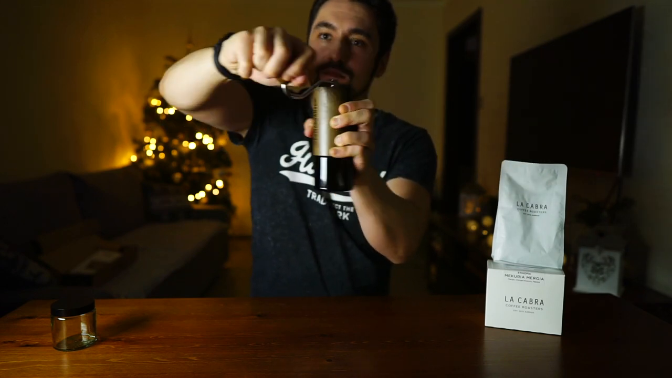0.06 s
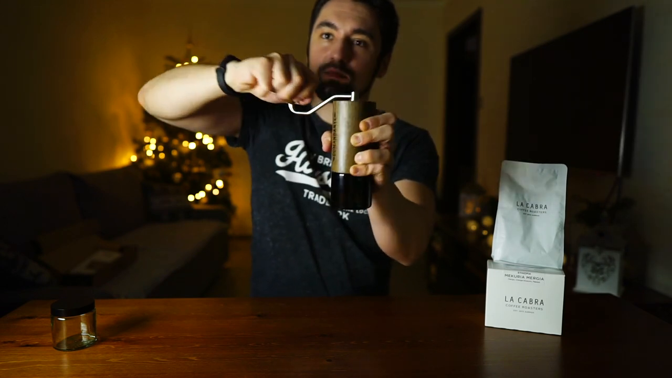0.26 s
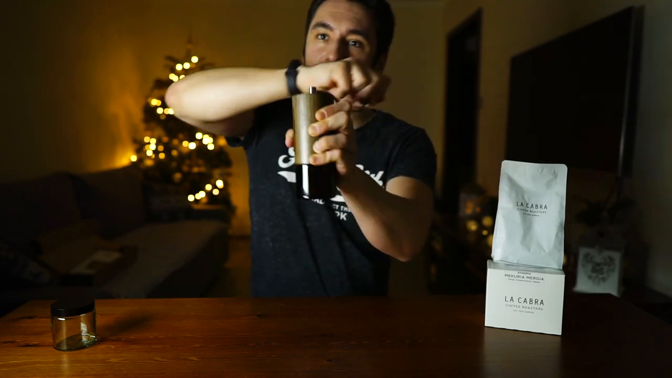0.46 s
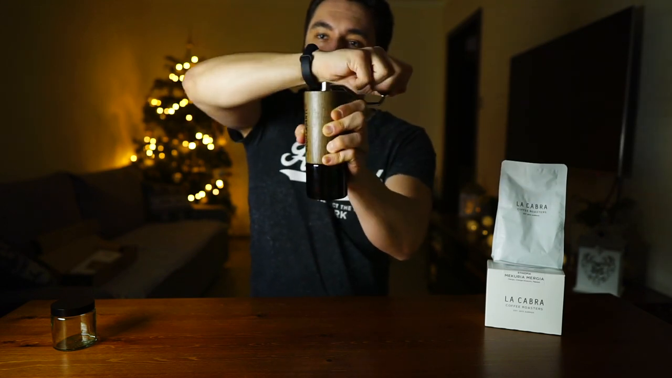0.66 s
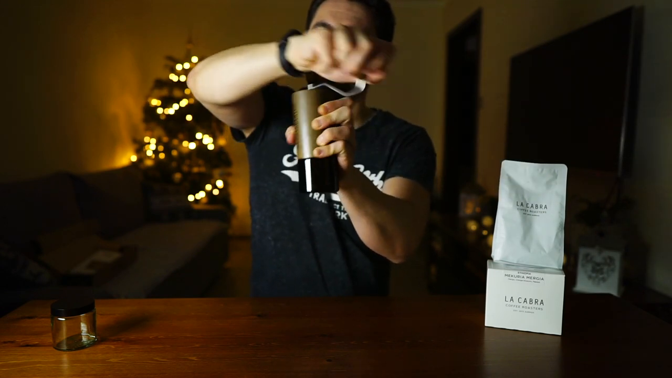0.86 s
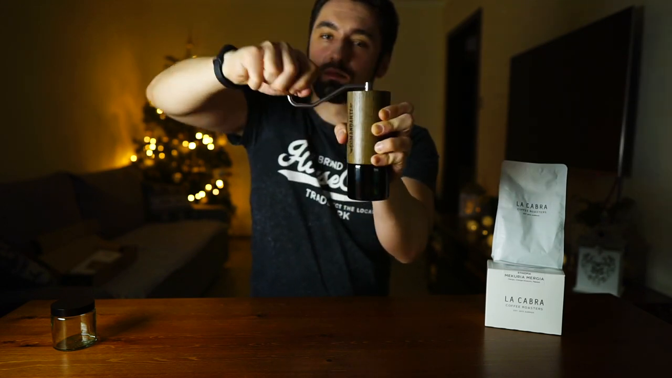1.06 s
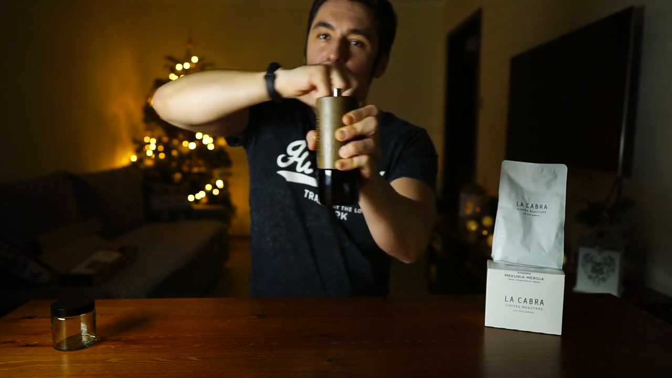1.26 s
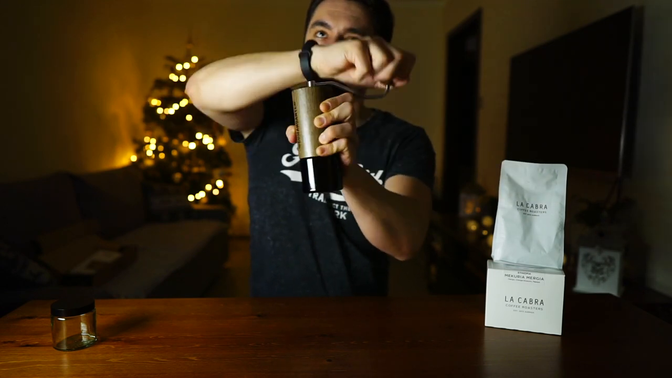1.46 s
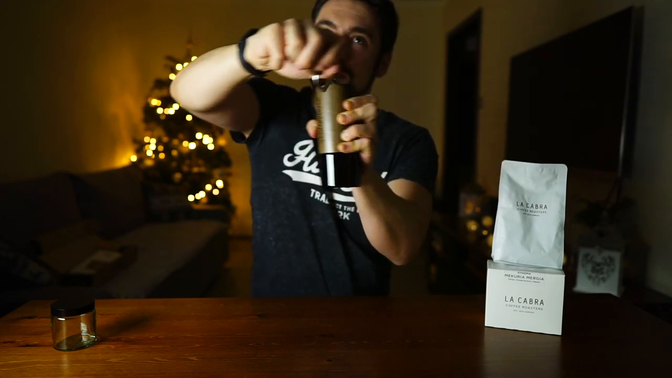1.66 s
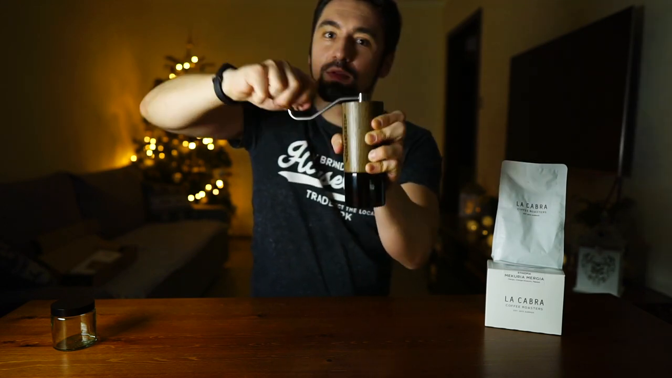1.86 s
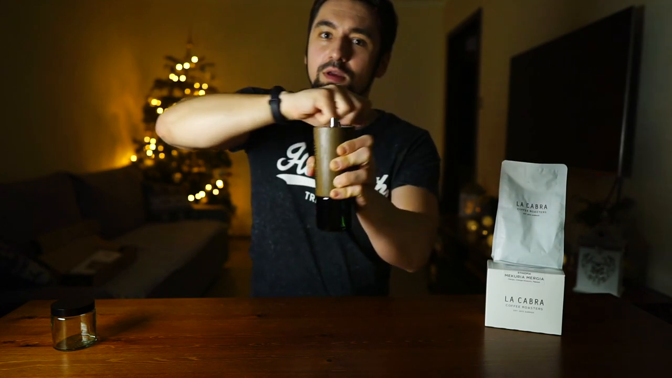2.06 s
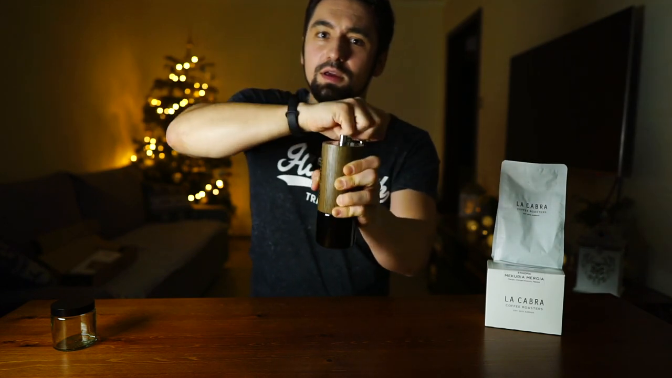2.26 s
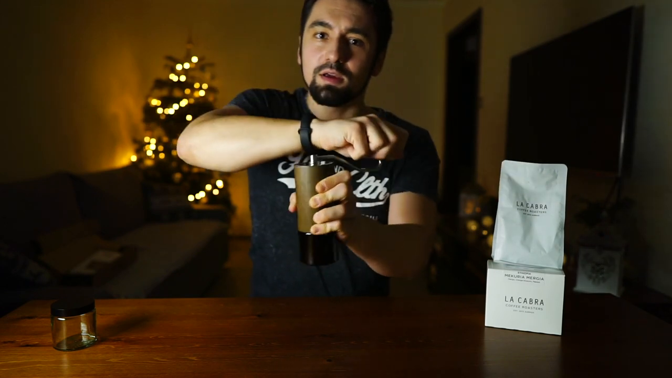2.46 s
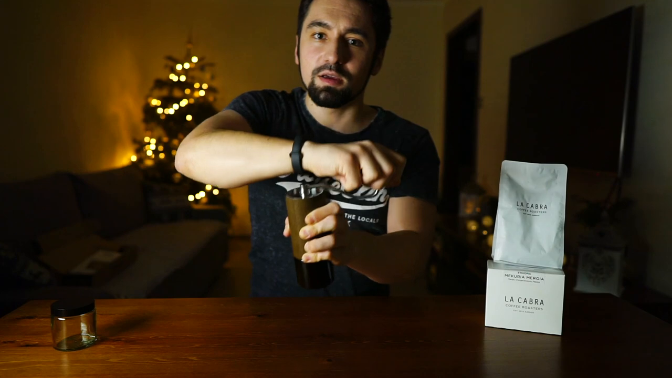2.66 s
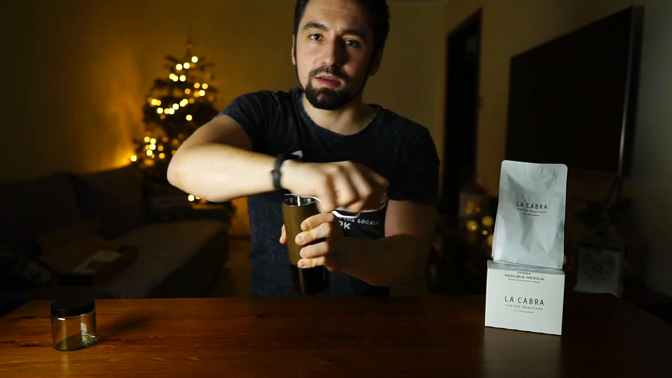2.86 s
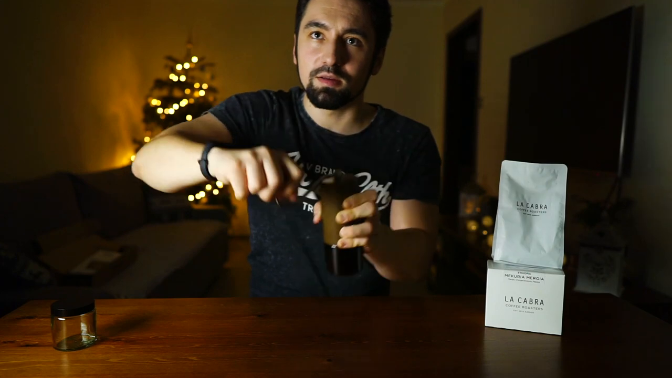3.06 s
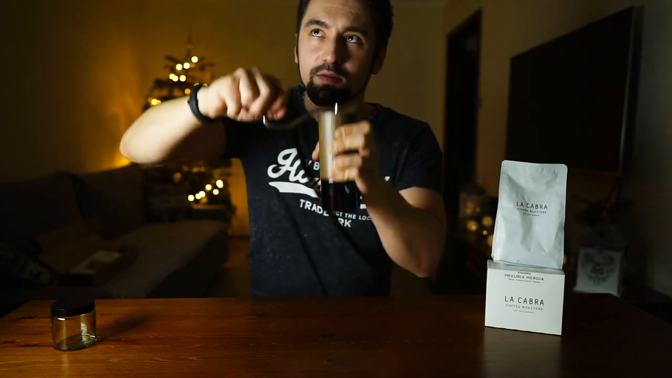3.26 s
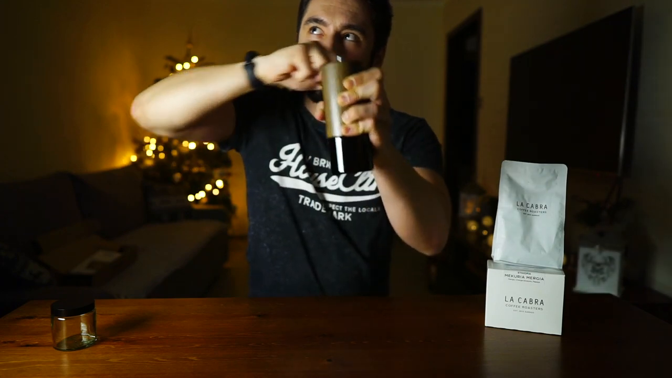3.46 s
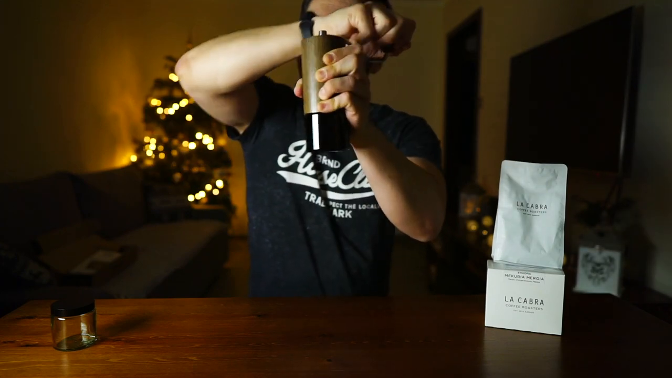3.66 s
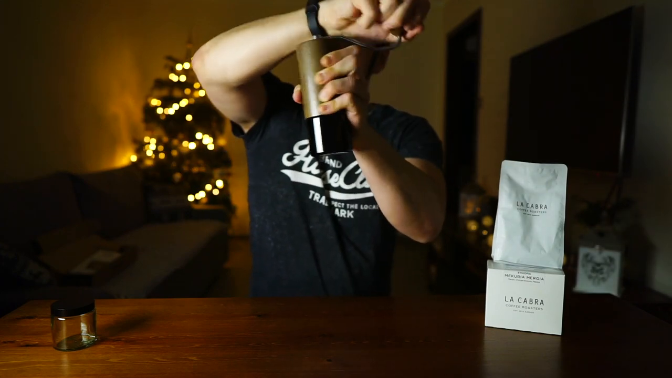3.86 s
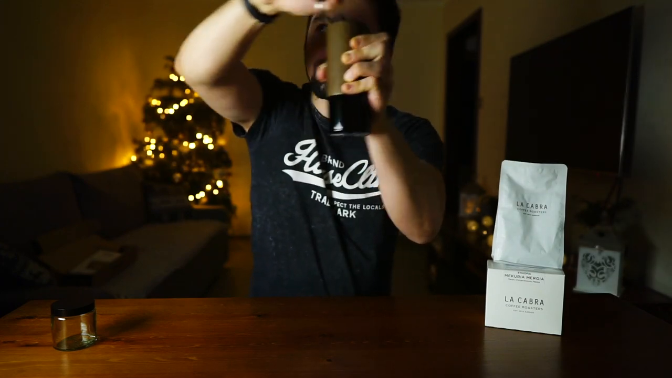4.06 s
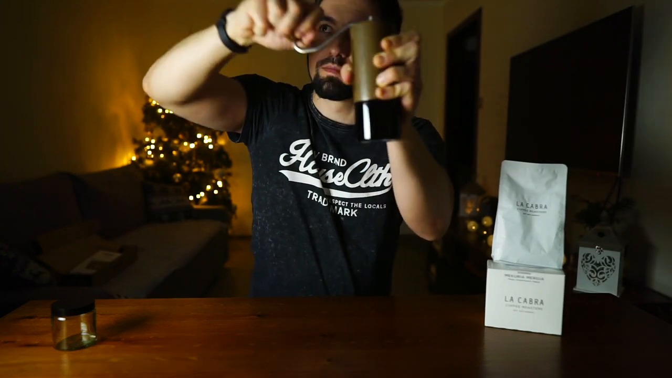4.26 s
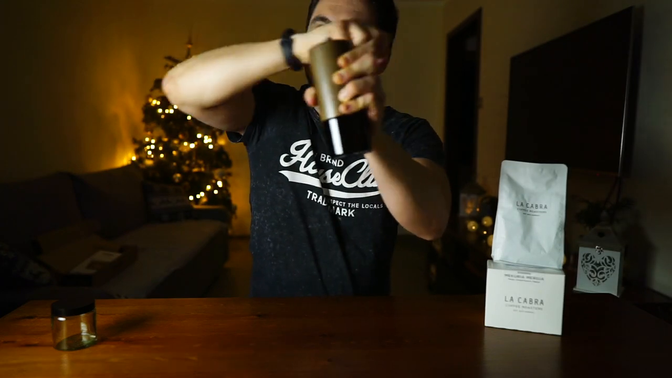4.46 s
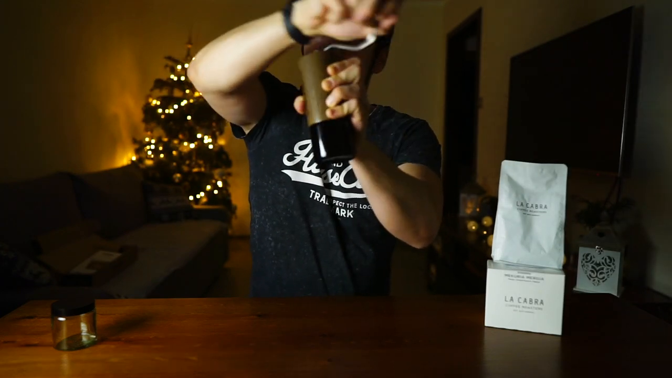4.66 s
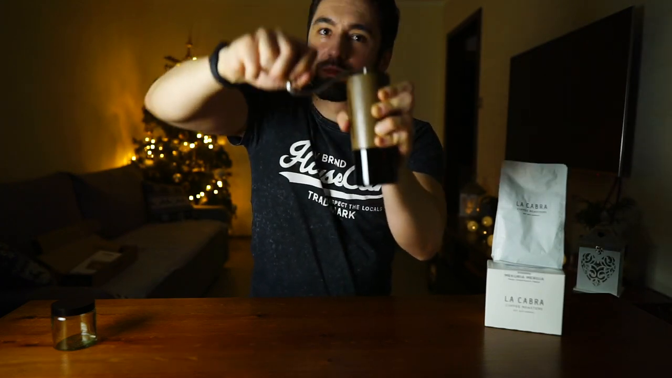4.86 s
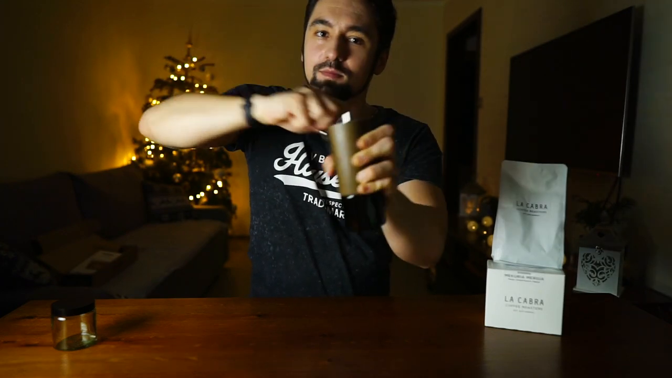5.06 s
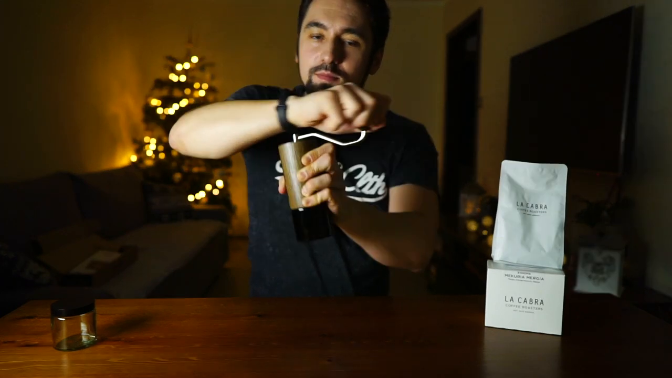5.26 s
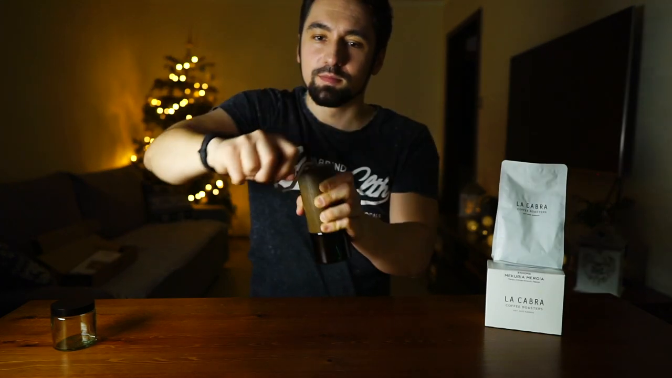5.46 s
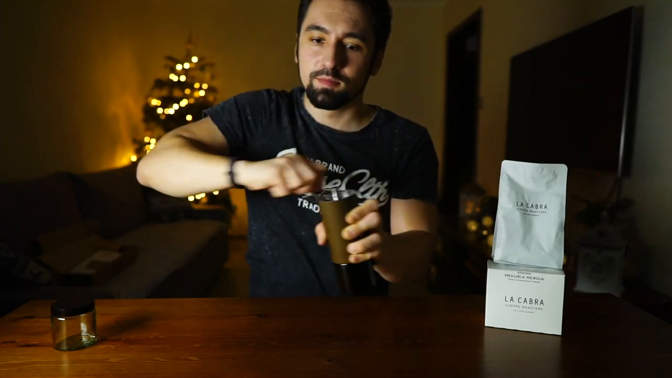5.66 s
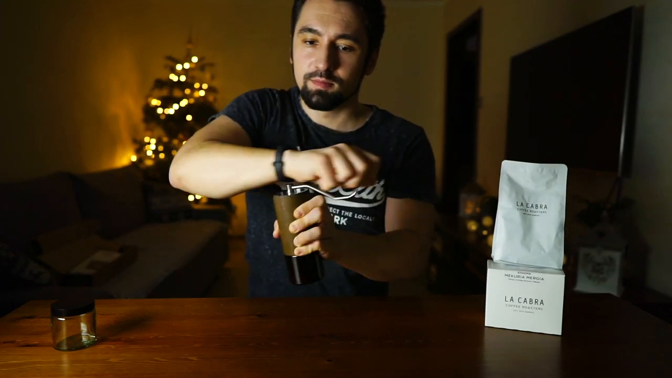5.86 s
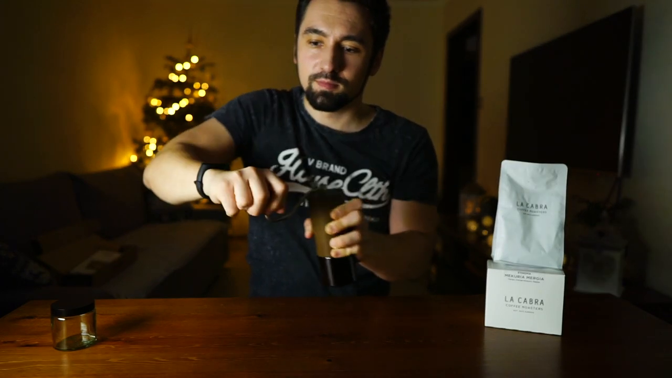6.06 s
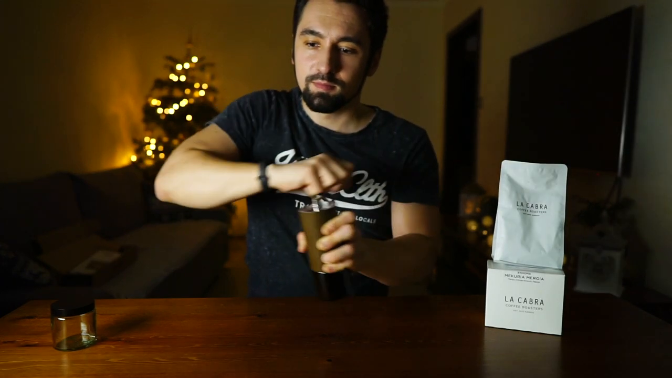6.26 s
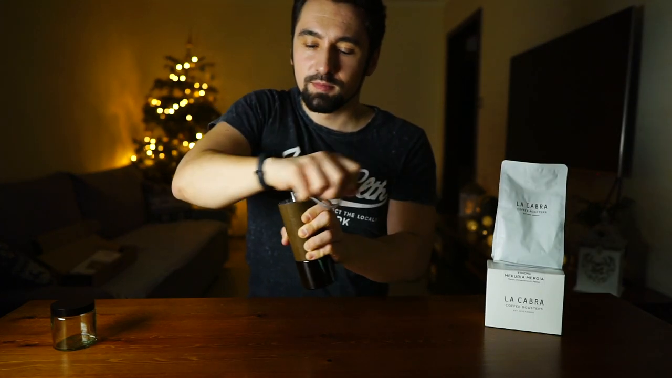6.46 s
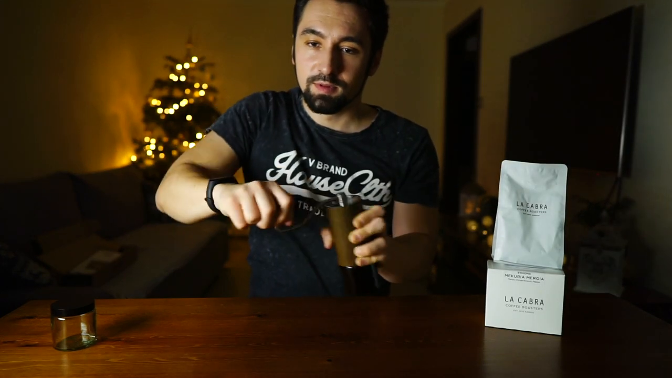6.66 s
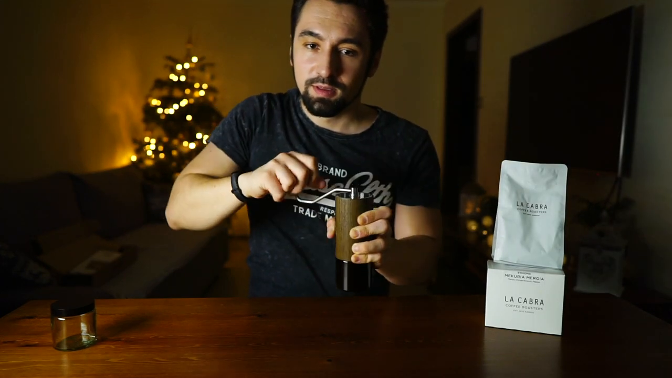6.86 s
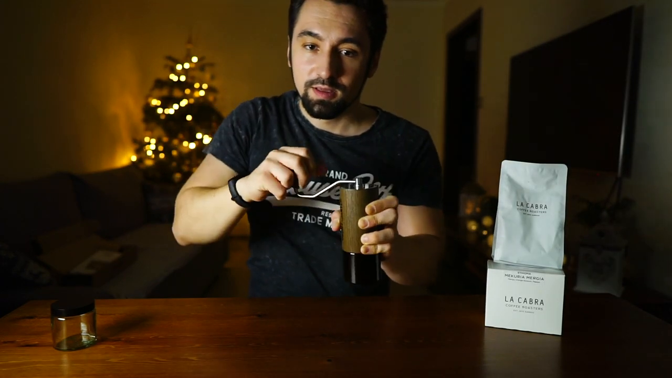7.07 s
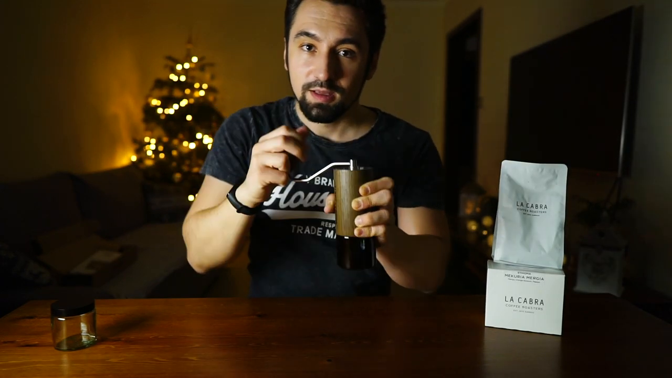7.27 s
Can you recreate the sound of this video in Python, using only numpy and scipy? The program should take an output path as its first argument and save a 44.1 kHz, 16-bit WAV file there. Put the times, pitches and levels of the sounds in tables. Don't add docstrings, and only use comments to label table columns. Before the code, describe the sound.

A hand-cranked coffee grinder is already crunching at the start, close and dry in a furnished room. Gritty, noisy strokes rub and crackle, with low air puffs at the microphone. From about 0.55 to 0.7 seconds it stalls, leaving small ticks, then bites again with sharp snaps and hollow metallic knocks until about 2.1. Around 2.1 to 2.9 the grinding breaks into short, weaker scraps with clicks and gaps; a barely audible distant engine climbs in pitch and fades by 3.1. Cracking resumes strongly near 3.35, catches around 3.7, and is densest and loudest from 4 to 5, with bright splintering and soft low gusts. After 5.1 the tube rings hollower; longer, steadier strokes soften, with scattered cracks until about 6.8. Then only short room reflections, faint hiss and a slight hum remain.

```python
import sys
import numpy as np
from scipy import signal
from scipy.fft import rfft, irfft
from scipy.io import wavfile

SR = 44100
rng = np.random.default_rng(int(sys.argv[2]) if len(sys.argv) > 2 else 0)


def undo_db(level):
    steps = np.asarray(level, float) / 20
    return 10 ** steps


def log_audio(samples):
    frames = np.atleast_2d(samples).T
    limited = np.clip(frames, -1, 1)
    pcm = np.round(limited * 32767).astype(np.int16)
    wavfile.write(sys.argv[1], SR, pcm)


N = 322812


def grinder():
    # [hz, width_hz, level_db]
    tube_modes = [(347, 640, -41), (660, 310, -22), (800, 109.6, -2), (995.8, 58, 1.5), (1185, 162, -13.5)]
    # [hz, width_hz, level_db]
    shell_modes = [(1410, 810, -7.5), (2019, 338, 0), (2265, 299, -1), (3022, 228, -1.5),
                   (4400, 570, -10.5)]
    # [hz, width_hz, level_db]
    burr_modes = [(5066, 500, -4), (5916, 630, 0.5), (8344, 1170, 0.5), (10060, 1200, -2),
                  (13870, 670, -15.5)]
    # [hz, width_hz, level_db]
    splinter_modes = [(9360, 690, -7.5), (14900, 1100, -2)]

    effort, hollow, facing = crank()
    fine = grit(700, spread_db=0.0, seconds=0.0014, rise=2.3, smooth=1.0)
    finer = grit(900, spread_db=7.0, seconds=0.00099, rise=2.5, smooth=0.33)
    coarse = grit(110, spread_db=1.5, seconds=0.0055, rise=3.3, smooth=4.3)
    chips = grit(45, spread_db=6.5, seconds=0.00066, rise=0.6, smooth=1.2)

    snaps, knocks = fractures(effort)
    snap = burst(snaps, 0.0025, 0.32)
    tiny_snap = burst(snaps, 0.00066, 0.15)
    knock = burst(knocks, 0.0028, 0.23)

    shell = undo_db(-6) * effort * evened(fine * coarse)
    shell += undo_db(-6.5 + 4.2 * wander(per_s=60)) * snap
    burrs = undo_db(-4.5) * effort * facing * evened((finer + 0.98 * fine) * coarse)
    burrs += undo_db(-3) * snap
    tube = undo_db(-3) * hollow * evened(coarse * (fine + 0.51)) + knock
    splinters = effort * facing ** 2.5 * chips
    splinters += undo_db(10 + 4 * wander(per_s=60)) * tiny_snap
    splinters *= undo_db(-24.5)

    noise, hiss = rng.standard_normal((2, N))
    body = ring(noise * tube, tube_modes, 290, 1390, shift_db=1.05)
    body += ring(noise * shell, shell_modes, 1200, 6000, shift_db=1.24)
    treble = ring(hiss * burrs, burr_modes, 3800, 19000, shift_db=1.1)
    treble += ring(hiss[::-1] * splinters, splinter_modes, 8000, 18000, shift_db=0.8)
    return body + treble


def crank():
    # [start_s, length_s, effort_db, effort_drift_over_stroke_db]
    strokes = [(0, .32, -18.5, -5.5), (0.328, 0.22, -18.5, -5.5), (0.714, 0.076, -29, 17),
               (0.859, 0.29, -15.5, -8.5), (1.134, 0.31, -22.5, 3), (1.446, 0.063, -27, 0.5),
               (1.515, 0.21, -18.5, -5.5), (1.724, .13, -20.5, -5), (1.861, .23, -22.5, -0.5),
               (2.106, 0.053, -21.5, -5), (2.338, 0.097, -36.5, -4.5), (2.434, 0.13, -21, -10),
               (2.634, 0.043, -21, -11.5), (2.716, 0.053, -23.5, -14), (2.864, .072, -41, 19.5),
               (2.948, 0.22, -20, -4), (3.177, .025, -33, -0.5), (3.339, 0.34, -17.5, -0.5),
               (3.705, 0.052, -36, 4), (3.887, 0.048, -18, 0.5), (3.974, .171, -17.5, 4),
               (4.152, 0.3, -19.5, -0.5), (4.431, 0.18, -16.5, -3), (4.632, 0.33, -15.5, -8),
               (4.987, 0.084, -31, 4.5), (5.072, .485, -19.5, -5), (5.556, 0.18, -24, 5.5),
               (5.735, 0.18, -25, 1.5), (5.922, 0.46, -22, -0.5), (6.372, 0.46, -23.5, 2.5)]
    # [peak_s, effort_db, tube_ring_db, length_s]
    surges = [(0.06, -4.5, -3.5, 0.04), (0.43, 0, 12.5, 0.077), (0.904, -9, 6.5, 0.024),
              (0.96, 6.5, -3.5, 0.061), (1.424, -7.5, 10, 0.033), (1.77, 6.5, -3.5, 0.039),
              (1.796, -9, 6, 0.014), (1.812, 11.5, 0.5, 0.028), (1.972, 5.5, -8, 0.019),
              (2.465, 4, 9, 0.073), (2.507, -13, -6, 0.046), (2.546, 4, 8, 0.02), (2.911, 11, 2, 0.063),
              (3.396, -1, 0, 0.072), (3.658, 2.5, -4, 0.041), (3.737, 5.5, -4.5, .02), (3.904, 5, 8, 0.037),
              (3.984, 7, 8, 0.027), (4.008, -3, -10.5, 0.072), (4.065, 1, 2, 0.11),
              (4.443, 7.5, 2.5, 0.036), (4.656, 3, 3, 0.024), (4.701, -7.5, -3.5, 0.026),
              (4.738, 4.5, -4, .04), (5.017, 12, -8, 0.043), (5.068, 7, -6, 0.11), (5.848, 6.5, 1, 0.076),
              (5.953, 0, 7, 0.05), (6.374, 3, 2.5, 0.052), (6.69, 3, 1.5, 0.15)]
    # [peak_s, tube_ring_db, length_s]
    swells = [(0.03, -2, 0.076), (0.115, -1, 0.047), (0.246, -3.5, 0.067), (0.297, 1, 0.034),
              (.75, 3, 0.029), (0.995, 6.5, 0.039), (1.14, 1, 0.039), (1.365, 3.5, .08), (1.71, 0, 0.045),
              (1.916, -15.5, 0.029), (2.037, 1.5, .07), (2.377, 2, .1), (2.657, 4, 0.039),
              (2.728, 10, 0.038), (3.39, -1, 0.041), (3.644, 2.5, 0.044), (4.261, 4, .04),
              (4.31, -1.5, .04), (4.526, 1.5, 0.16), (4.79, 5.5, 0.11), (5.115, 11, .05),
              (5.175, 11, 0.037), (5.301, 5, 0.11), (5.412, 4.5, 0.13), (5.578, -8, 0.069),
              (5.675, 1, 0.16), (5.79, -3, 0.039), (5.998, 5, 0.068), (6.132, -8, 0.16), (6.497, 4, 0.11)]
    # [time_s, treble_lift_facing_microphone_db, tube_freedom_db]
    grip = [(0, -0.5, 6), (.4, 1, 0.5), (.8, -0.5, 2.5), (1.2, -0.5, 3), (1.6, 1, 3), (1.9, -1, 3.5),
            (2.3, 0, 0.5), (2.7, 0, -7), (3.0, -0.5, 7.5), (3.45, 1, 1), (3.65, 0.5, 4), (3.8, 3, 0),
            (4.2, -2, 0), (4.5, 1, 3), (5.1, -1, 1), (5.6, 0, 5), (6.2, 1.5, 6.5), (6.85, -1.5, 1.5)]
    bite_s, bite_db = 0.004, -8
    ease_s, ease_db = 0.0092, -6.5

    t = np.arange(0, N + 32, 32) / SR
    effort, lift_db, ring_db = np.zeros((3, len(t)))
    for start, length, effort_db, drift_db in strokes:
        u = t - start
        stroke_db = effort_db + drift_db * np.clip(u / length, 0, 1)
        if start > 0:
            stroke_db += bite_db * np.clip(1 - u / bite_s, 0, 1)
        stroke_db += ease_db * np.clip(1 - (length - u) / ease_s, 0, 1)
        effort = np.maximum(effort, (u >= 0) * (u < length) * undo_db(stroke_db))
    for peak, surge_db, extra_db, length in surges:
        lift_db += surge_db * hump(t, peak, length)
        ring_db += extra_db * hump(t, peak, length)
    for peak, swell_db, length in swells:
        ring_db += swell_db * hump(t, peak, length)

    now = np.arange(N) / SR
    grip_s, facing_db, free_db = np.transpose(grip)
    effort = np.interp(now, t, effort * undo_db(lift_db)) * undo_db(0.7 * wander(per_s=40))
    hollow_db = np.interp(now, t, ring_db) + np.interp(now, grip_s, free_db)
    hollow = effort * undo_db(hollow_db + 1.03 * wander(per_s=30))
    return effort, hollow, undo_db(np.interp(now, grip_s, facing_db))


def hump(t, peak_s, length):
    rise = 0.39
    up = 1 + (t - peak_s) / (rise * length)
    down = 1 - (t - peak_s) / ((1 - rise) * length)
    return np.clip(np.minimum(up, down), 0, 1)


def fractures(effort):
    # [time_s, snap_peak_db, tube_ring_peak_db]
    cracks = [(0.1487, -13, -10), (1.315, -4, -17), (0.3373, -11, -26.5), (0.397, 3, -7), (0.711, 1, -13.5),
              (0.7476, -9, -15.5), (.782, 0, -6), (0.854, 0.5, -12), (1.046, -7, -3.5), (1.143, 2, -20),
              (1.3512, -3, 0), (1.512, 3.5, -1.5), (1.58, 3, 0), (1.6068, 2.5, 2), (2.063, -3.5, -1),
              (2.436, -18, -15), (2.6341, -5, -9.5), (2.717, -4.5, -30), (2.951, -21, 0.5), (3.015, 2, 2),
              (3.3348, -5, -20), (3.394, 6, -3), (3.5775, 0.5, -8.5), (3.737, 1.5, -7), (3.84, 0.5, -28),
              (3.8509, 0, -1), (3.8935, -3.5, -14), (3.973, 2.5, -3), (4.138, -2.5, -7.5),
              (4.168, 3.5, -12.5), (4.205, -4.5, 0)]
    # [time_s, snap_peak_db, tube_ring_peak_db]
    late_cracks = [(4.256, -13, 0.5), (4.264, 1, -12), (4.318, 0, -30), (4.3994, 5.5, 1), (4.482, -5, -13),
                   (4.641, -12, -15), (4.7305, -1, -12), (4.865, -1, -9), (4.907, -7, -28),
                   (4.988, -7, -45), (5.0504, -1, -14), (5.1177, 2, -16), (5.1967, -7.5, -12.5),
                   (5.4024, -2, -11), (5.669, -3.5, -8.5), (5.899, -4.5, -21), (5.928, -13, -6),
                   (6.041, -9.5, -22), (6.105, -5, -24), (6.3442, -8, -15), (6.565, -22, -9),
                   (6.41, -4, -12), (6.725, -7, -16), (6.7844, -6.5, -22), (6.844, -3, -26.5)]
    # [time_s, snap_peak_db, tube_ring_peak_db]
    ticks = [(0.5921, -12.5, -32.5), (0.6285, -10, -33.5), (0.668, -21, -46), (0.681, -14, -35.5),
             (2.198, -14, -40), (2.3442, -37, -35.5), (2.363, -10.5, -39), (2.387, -15.5, -28),
             (2.424, -23, -36), (2.5232, -20, -10.5), (2.54, -9, -28.5), (2.611, -20, -36),
             (2.737, -13, -22.5), (2.7556, -15, -40), (3.1888, -4, -34), (3.31, -25.5, -48),
             (3.3222, -14, -34), (3.713, -4.5, -20), (3.7514, -13, -37.5), (3.7606, -24, -35.5),
             (3.9594, -7.5, -35.5)]
    chips_per_s, spread_db = 10, 2.5

    lesser = (rng.random(N) < chips_per_s / SR) * effort
    snaps = lesser * undo_db(9.5 + spread_db * rng.standard_normal(N))
    knocks = lesser * undo_db(4 + spread_db * rng.standard_normal(N))
    for events in (cracks, late_cracks, ticks):
        for s, snap_db, knock_db in events:
            at = round(s * SR)
            snaps[at] = undo_db(snap_db)
            knocks[at] = undo_db(knock_db)
    return undo_db(-14) * snaps, undo_db(-7.0) * knocks


def grit(per_s, spread_db, seconds, rise, smooth):
    sizes = undo_db(spread_db * np.minimum(rng.exponential(1, N), 3.5))
    train = sizes * (rng.random(N) < per_s / SR)
    return evened(evened(burst(train, seconds, rise)) + smooth)


def burst(train, seconds, rise):
    u = np.arange(600) / (max(seconds, 1e-4) * SR)
    shape = (1 - np.exp(-u / max(rise, 1e-3))) * np.exp(-u ** 1.84)
    return signal.oaconvolve(train, shape / shape.max())[:N]


def ring(drive, modes, low_hz, high_hz, shift_db):
    band = signal.butter(3, [low_hz, high_hz], "bandpass", fs=SR, output="sos")
    total = np.zeros(N)
    click = np.zeros(8192)
    for k, (hz, width, db) in enumerate(modes):
        b, a = signal.iirpeak(hz, hz / width, SR)
        b = b * (-1) ** k * undo_db(db)
        share_db = shift_db * (wander(per_s=22) + 1.17 * wander(per_s=6))
        total += signal.lfilter(b, a, drive * undo_db(share_db))
        click += signal.lfilter(b, a, signal.unit_impulse(8192))
    return signal.sosfilt(band, total) / np.linalg.norm(signal.sosfilt(band, click))


def room(x, count=20):
    place = np.arange(N) / N * (count - 1)
    out = np.zeros(N + SR)
    for k in range(count):
        share = np.cos(np.pi / 2 * np.clip(place - k, -1, 1))
        live = np.flatnonzero(share > 1e-9)
        start, end = live[0], live[-1] + 1
        wet = signal.fftconvolve((x * share)[start:end], tail())
        out[start:start + len(wet)] += wet
    return out[:N]


def tail():
    # [hz, t60_s]
    decay = [(500, 0.35), (1000, 0.39), (2500, 0.39), (5500, .35), (8500, 0.29), (14000, .24)]
    length = SR // 2
    taps = np.zeros(length)
    at = np.arange(130, length - 16, 16)
    taps[at + rng.integers(0, 16, len(at))] = rng.choice([-1.0, 1.0], len(at))
    taps *= 1 - np.exp(-np.arange(length) / (0.014 * SR))
    hz, t, z = signal.stft(taps, SR, nperseg=256)
    fade = undo_db(-60 * t / read(decay, hz)[:, None])
    echo = signal.istft(z * fade, SR, nperseg=256)[1]
    return echo / np.linalg.norm(echo)


def puffs():
    # [peak_s, length_s, push_db, fast_edge_flutter_relative_db]
    gusts = [(0, 0.086, -25.5, -14.5), (0.162, 0.16, -23.5, -28), (.38, 0.19, -40.5, -16),
             (0.902, 0.09, -36, -26.5), (1.042, 0.11, -25.5, -18), (1.16, .18, -31, -23.5),
             (1.5, 0.51, -48.5, -24.5), (1.708, 0.18, -44, -14), (1.87, 0.13, -36, -22),
             (2.0, 0.16, -49, -15), (3.41, 0.13, -32, -10.5), (3.516, 0.21, -33.5, -28.5),
             (3.69, 0.092, -40.5, 0), (3.972, .2, -26, -38.5), (4.147, 0.16, -18, -11),
             (4.274, 0.21, -25, -9), (4.382, 0.17, -25.5, -22), (4.515, 0.086, -30.5, -30),
             (4.72, .2, -40, -8.5), (4.86, 0.22, -24.5, -21), (5.052, .22, -35, -23), (5.4, 0.13, -45, -22),
             (5.66, 0.18, -51, -19), (6.75, .2, -54, -20)]
    # [hz, density_db]
    push_colour = [(4, 8.5), (12, 1.5), (32, -2), (70, -7), (120, -33.5), (250, -57.5)]
    # [hz, density_db]
    flutter_colour = [(50, -20.5), (100, 2.5), (170, -6), (240, -10), (400, -17.5), (700, -60)]
    calm_db, calm_flutter_db = -56, -19.5
    fall_db, rise = 16, 0.88

    t = np.arange(0, N / SR + 0.01, 0.002)
    push = np.full(len(t), undo_db(calm_db))
    flutter = np.full(len(t), undo_db(calm_db + calm_flutter_db))
    for peak, length, db, flutter_db in gusts:
        away = np.maximum(t - peak, (peak - t) / rise) / (length / 2)
        gust = undo_db(db - fall_db * away)
        push += gust
        flutter += gust * undo_db(flutter_db)
    now = np.arange(N) / SR
    slow = np.interp(now, t, push) * coloured(push_colour)
    return slow + np.interp(now, t, flutter) * coloured(flutter_colour)


def floor(loud):
    # [hz, density_db]
    hiss_colour = [(40, -20), (70, -12), (140, -8), (230, -9), (340, -16), (480, -15), (800, -22),
                   (1500, -29), (4000, -32), (12500, -26), (16000, -28)]
    # [hz, width_hz, level_db]
    hum_modes = [(226, 21, 0)]
    recent = signal.lfilter([1 / 1200], [1, 1 / 1200 - 1], loud ** 2)
    recent_db = 10 * np.log10(recent + 1e-12)
    held = undo_db(-5 * np.clip((recent_db + 58) / 14, 0, 1))
    hum = evened(ring(rng.standard_normal(N), hum_modes, 150, 320, shift_db=3.1))
    return undo_db(-66) * held * coloured(hiss_colour) + undo_db(-75.5) * hum


def drone():
    # [time_s, pitch_hz, level_db]
    engine = [
        (1.8, 218, -85),
        (2.1, 222, -71),
        (2.5, 236, -70),
        (2.85, 260, -72),
        (3.1, 262, -85),
    ]
    s, hz, db = np.transpose(engine)
    now = np.arange(N) / SR
    pitch = np.interp(now, s, hz) * (1 + 0.006 * wander(per_s=25))
    turns = np.cumsum(pitch) / SR
    level_db = np.interp(now, s, db, -120, -120) + 1.6 * wander(per_s=14)
    return undo_db(level_db) * np.sin(2 * np.pi * turns)


def wander(per_s):
    knots = np.arange(0, N / SR + 1, 1 / per_s)
    return np.interp(np.arange(N) / SR, knots, rng.standard_normal(len(knots))) * 0.98


def coloured(points):
    hz = np.fft.rfftfreq(N, 1 / SR)
    return evened(irfft(rfft(rng.standard_normal(N)) * undo_db(read(points, hz)), N))


def read(points, hz):
    f, value = np.transpose(points)
    return np.interp(np.log(hz + 1), np.log(f + 1), value)


def evened(x):
    return x / np.sqrt(np.mean(x ** 2) + 1e-20)


def scene():
    direct = grinder()
    reflected = undo_db(-10.5) * room(direct)
    mix = direct + reflected + puffs() + floor(direct) + drone()
    return mix[None]


def roll_off(x):
    return signal.sosfilt(signal.butter(12, 16430, fs=SR, output="sos"), x)


def record(dry):
    x = dry / 0.98
    squeezed = 0.98 * np.tanh(x + x ** 3 / 3)
    edge = signal.firwin(801, 15800, window=("kaiser", 8), fs=SR)
    limited = signal.oaconvolve(squeezed, edge[None], "same")
    return roll_off(limited)


dry = scene()
out = record(dry)
log_audio(out)
```